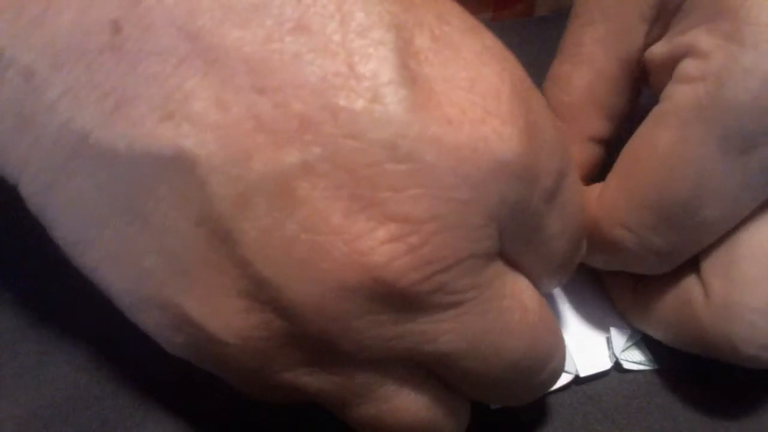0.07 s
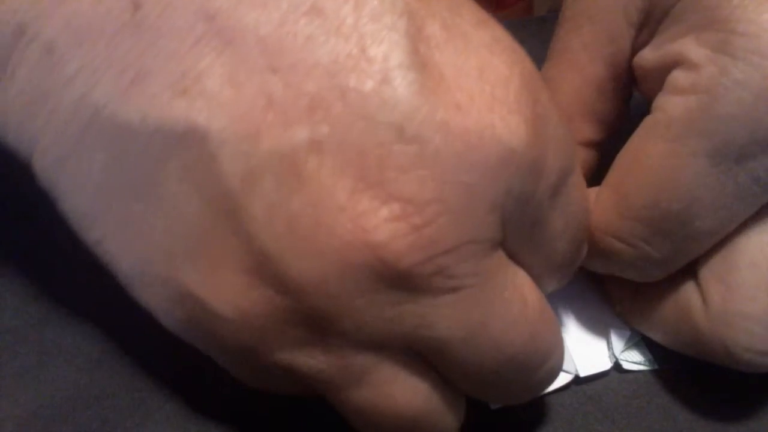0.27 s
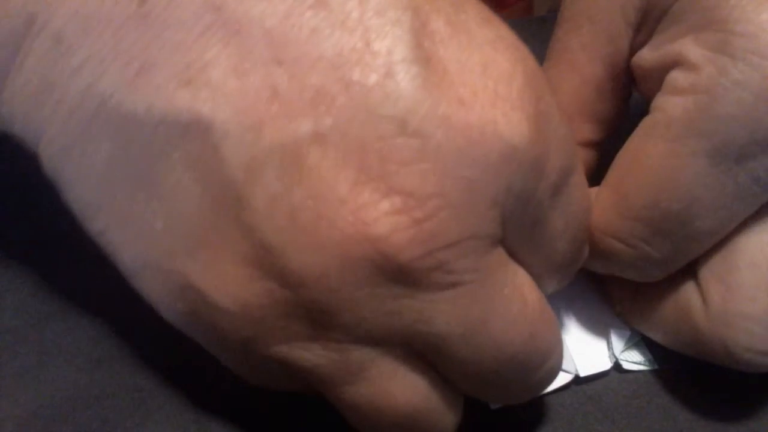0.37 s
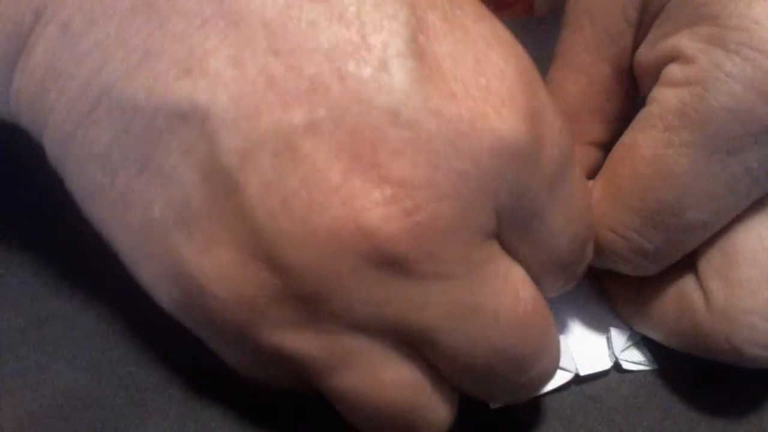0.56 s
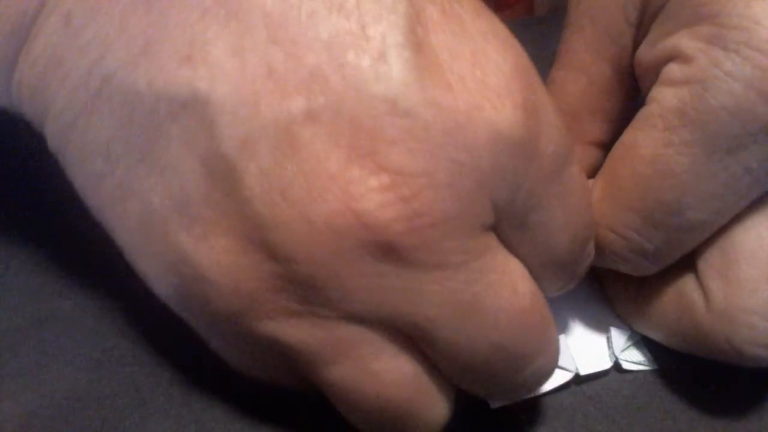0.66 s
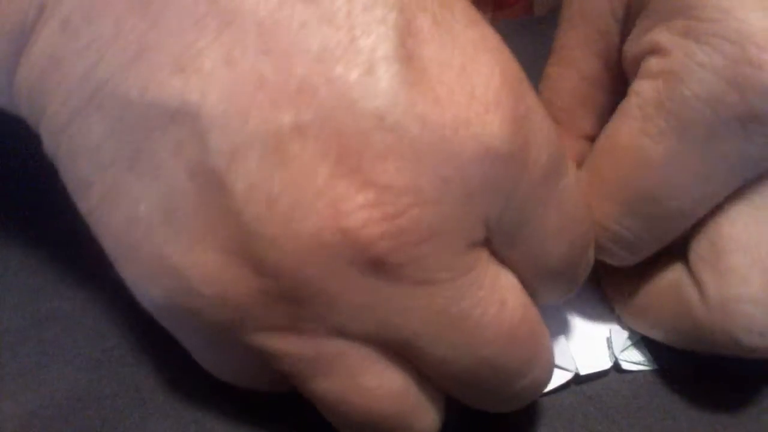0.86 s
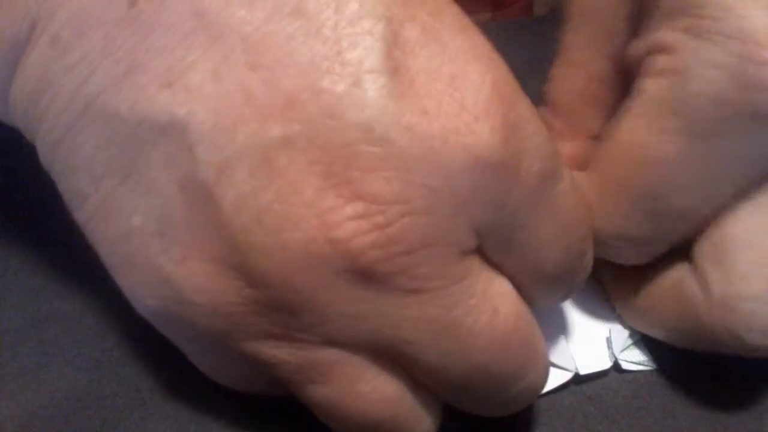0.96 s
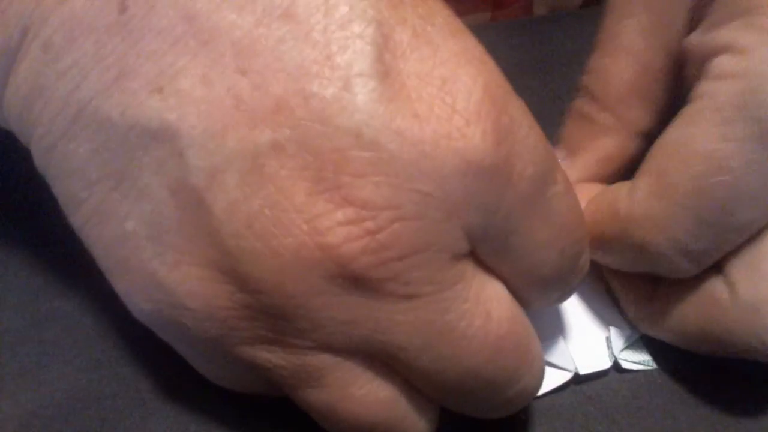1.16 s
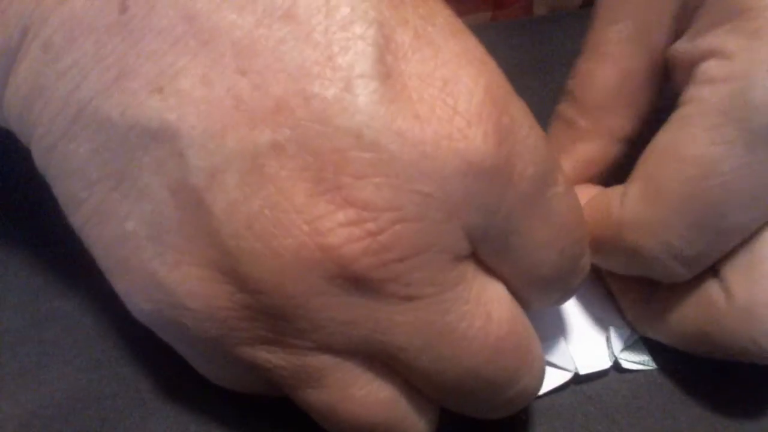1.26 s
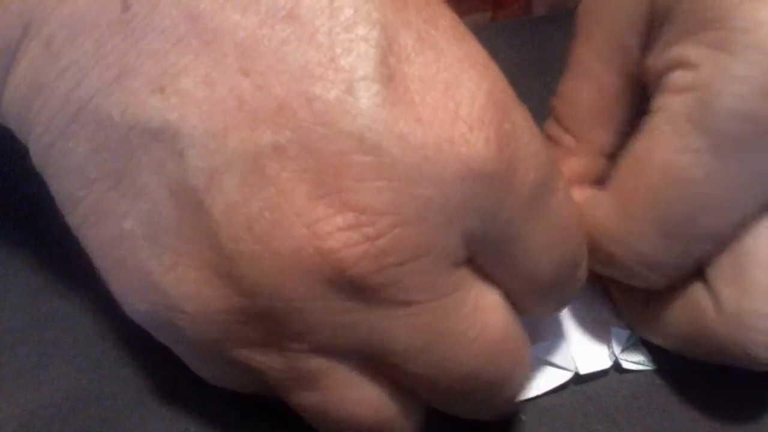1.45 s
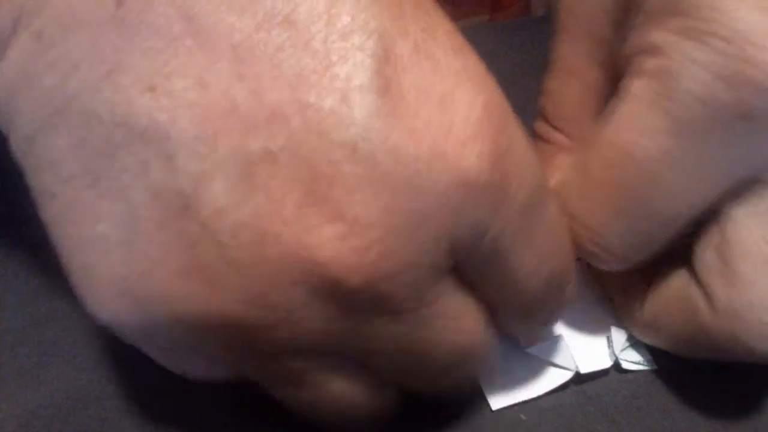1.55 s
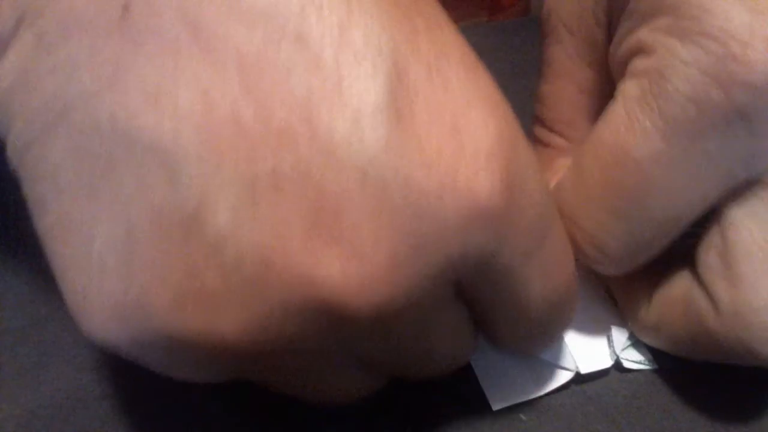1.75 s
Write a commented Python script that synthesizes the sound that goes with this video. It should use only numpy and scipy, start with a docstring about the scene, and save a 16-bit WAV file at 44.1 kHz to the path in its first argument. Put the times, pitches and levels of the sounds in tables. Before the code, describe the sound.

Stiff paper folded by hand, heard very close in a small quiet room. Faint ticks open, then one sharp, bright crack at 0.24 s. A smaller snap follows at 0.39 s, light ticks near 0.6 s, and a cluster of snaps and crisp crinkles from 0.68 to 0.83 s, with faint soft finger bumps. It nearly quiets, then a fingernail scrapes along the crease from 1.36 to 1.7 s, strongest around 1.53 s, before faint room air.

```python
"""A few faint ticks and small snaps over quiet room air lead to one sharp crack as a fold in stiff
paper gives. More snaps, ticks and crinkles follow as fingers press it flat on a cloth-covered table,
close to the microphone, and a fingernail runs along the crease. Impulses ring the sheet for snaps,
bell-shaped wave packets make ticks and bumps, and random fibre clicks make every rub. A small quiet
room answers briefly."""
import sys
import numpy as np
from scipy import signal
from scipy.fft import rfft
from scipy.io import wavfile

SR = 44100
rng = np.random.default_rng(int(sys.argv[2]) if len(sys.argv) > 2 else 0)


def digitize_waveform(pressure):
    """Quantize a signal to 16-bit integers and store it at the path in sys.argv[1].

    Rows of a 2-D input are taken as channels; values are limited to [-1, 1].
    """
    field = np.atleast_2d(pressure).T
    bounded = np.clip(field, -1, 1)
    quanta = np.round(bounded * 32767).astype(np.int16)
    wavfile.write(sys.argv[1], SR, quanta)


N = 79380
TIME = np.arange(N) / SR


def amp(db):
    """Decibels to gain."""
    return 10 ** (np.asarray(db) / 20)


def evened(x):
    """Scales to rms 1."""
    return x / np.sqrt(np.mean(x ** 2) + 1e-20)


def add(mix, start_s, sound):
    """Mixes a sound in at its start time."""
    part = mix[max(round(start_s * SR), 0):][:len(sound)]
    part += sound[:len(part)]


def through(x, response):
    """Passes x through an impulse response."""
    return signal.fftconvolve(x, response)[:len(x)]


PIVOT_HZ = 3000  # a tilt leaves this frequency unchanged


def ring(colour, tilt=0, size=2048):
    """Minimum-phase impulse response of unit energy with this colour, tilted in dB per octave."""
    hz = np.maximum(abs(np.fft.fftfreq(size, 1 / SR)), 1)
    colour_hz, colour_db = np.transpose(colour)
    db = np.interp(np.log(hz), np.log(colour_hz), colour_db)
    # the tilt levels off an octave below the pivot
    db = db + tilt * np.log2(np.maximum(hz, PIVOT_HZ / 2) / PIVOT_HZ)
    spectrum = np.exp(np.conj(signal.hilbert(np.log(amp(db)))))
    response = np.fft.ifft(spectrum).real
    return response / np.linalg.norm(response)


def tail(t60_s, delay_s):
    """Dense random echoes of unit energy that start after a delay and die away."""
    t = TIME[:SR // 3]
    echoes = rng.standard_normal(len(t)) * amp(-60 * t / t60_s) * (t > delay_s)
    return echoes / np.linalg.norm(echoes)


GRIP_DB, GRIP_S = .5, .006  # depth of the catch and let-go; half length of its smoothing window


def grains(per_s, spread_db):
    """Tiny slips of paper fibres: random clicks of uneven size, in clumps as the grip varies."""
    size = amp(spread_db * np.minimum(rng.exponential(1, N), 4))
    grip = evened(through(rng.standard_normal(N), np.hanning(int(2 * GRIP_S * SR))))
    sign = rng.choice([-1, 1], N)
    slipping = rng.random(N) < per_s / SR
    return evened(amp(GRIP_DB * grip) * size * sign * slipping)


def packets(rows):
    """Soft pushes: a few cycles under a bell-shaped envelope."""
    out = np.zeros(N)
    for centre_s, db, hz, half_s in rows:
        t = TIME - centre_s
        out += amp(db) * np.exp(-(t / half_s) ** 2) * np.sin(2 * np.pi * hz * t)
    return out


def rubs(rows, colour, release_s, per_s, spread_db):
    """Short bursts of fibre slips that ring the sheet: attack, a hold that fades or grows, release."""
    out = np.zeros(N)
    t = TIME[:SR // 6]
    for start_s, attack_s, length_s, db, change_db, tilt in rows:
        rise = np.minimum(t / attack_s, 1)
        hold = amp(db + change_db * np.minimum(t / length_s, 1))
        release = np.exp(-np.maximum(t - length_s, 0) / release_s)
        slips = grains(per_s, spread_db)[:len(t)]
        add(out, start_s, through(rise * hold * release * slips, ring(colour, tilt)))
    return out


FLUTTER_DB, FLUTTER_T60_S = -10, .022  # the sheet shivers after each snap and tick edge
FLUTTER_DELAY_S = .0009


def buckle(colour, db, tilt, flutter_db, t60_s):
    """One impulse rings the sheet, which shivers for a moment."""
    hit = ring(colour, tilt)
    hit = hit * amp(db) / abs(hit).max()
    return hit + amp(flutter_db) * through(hit, tail(t60_s, FLUTTER_DELAY_S))


AIR_DB = -71  # rms
HUM_HZ, HUM_DB = 827, -80.5  # faint whine, peak level
# Spectrum of the room air: f/Hz, relative level/dB
AIR_COLOUR = [(15, -45.5), (25, -30), (50, -17.5), (110, 0), (200, -2.5), (350, -7.5), (700, -10.5),
              (850, -11), (1000, -16.5), (2000, -20), (4200, -28), (5500, -37), (10000, -40), (15000, -41)]


def air():
    """Steady filtered noise for the room, with a faint sine whine in it."""
    noise = evened(through(rng.standard_normal(N), ring(AIR_COLOUR, size=8192)))
    return amp(AIR_DB) * noise + amp(HUM_DB) * np.sin(2 * np.pi * HUM_HZ * TIME)


ROOM_DB, CRACK_ROOM_DB = -22, -23.5  # echo sends
ROOM_T60_S, ROOM_DELAY_S = 0.12, .008
# Colour of what the room gives back: f/Hz, relative level/dB
WALL_COLOUR = [(300, 1.5), (2500, -2), (5000, -6.5), (10000, -8.5)]


def room(paper, loud):
    """The walls return dense, short, coloured echoes of the paper and of its crack."""
    walls = ring(WALL_COLOUR)
    walls = walls / abs(rfft(walls)).max()
    echoes = through(tail(ROOM_T60_S, ROOM_DELAY_S), walls)
    return through(amp(ROOM_DB) * paper + amp(CRACK_ROOM_DB) * loud, echoes)


# Fingertips bumping the table: centre t/s, peak level/dB, f/Hz, half length t/s
TABLE_BUMPS = [(.298, -57, 126.7, 0.0073), (.391, -54, 150, 0.0036), (.457, -60, 230, 0.0031),
               (.5905, -53, 165, 0.0046), (.721, -58, 160, 0.0042), (.921, -61, 187.3, 0.0052),
               (1.063, -64.5, 224, 0.0052), (1.387, -60, 255.5, 0.0056), (1.614, -62, 128, 0.0072)]


def bumps():
    """Fingertips push the table into a few soft low cycles."""
    return packets(TABLE_BUMPS)


FIBRES_PER_S, FIBRE_SPREAD_DB = 14000, 2.2  # slips under a finger or nail
# Fingers sliding on a ringing panel: start t/s, length t/s, level/dB, f/Hz, bandwidth f/Hz
PANEL_CHAFES = [(0.157, 0.012, -77, 3900, 1600), (.414, 0.04, -56, 2810, 880),
                (0.419, 0.021, -66, 4050, 694), (0.526, 0.054, -72, 3250, 1480),
                (0.658, .035, -56, 2900, 600), (0.792, 0.0083, -60.5, 1410, 500),
                (0.818, 0.013, -55.5, 1450, 395), (1.006, .012, -68.5, 1900, 903),
                (1.012, 0.042, -67.5, 3200, 698), (1.093, .028, -68.5, 680, 249.4),
                (1.231, 0.019, -70, 1640, 400), (1.383, .014, -71, 3060, 1200),
                (1.504, .06, -60, 2090, 496), (1.573, 0.059, -56, 2215, 447),
                (1.616, 0.061, -56, 2760, 604), (1.662, .032, -69.5, 400, 350),
                (1.686, 0.038, -76, 4200, 800)]


def chafes():
    """Fibre slips under a sliding finger swell and fade in one resonance of the panel."""
    out = np.zeros(N)
    t = TIME[:SR // 20]
    for start_s, length_s, db, hz, width_hz in PANEL_CHAFES:
        mode = t * np.exp(-np.pi * width_hz * t) * np.sin(2 * np.pi * hz * t)
        progress = np.clip((TIME - start_s) / length_s, 0, 1)
        swell = np.sin(np.pi * progress).clip(0) ** .5
        ringing = evened(through(grains(FIBRES_PER_S, FIBRE_SPREAD_DB), mode))
        out += amp(db) * swell * ringing
    return out


CRINKLE_RELEASE_S = .004
CRINKLES_PER_S, CRINKLE_SPREAD_DB = 8400, 2.5
# Bursts of crinkling: start t/s, attack t/s, length t/s, level/dB,
# level change over the length/dB, brightness/dB per octave
PRESSED_CRINKLES = [(.221, 0.0026, 0.017, -66.5, 3, -3.5), (.3215, .001, 0.027, -71, -5, 3.5),
                    (.382, .002, 0.015, -59.5, 6, -6), (.412, 0.0022, 0.038, -59.5, -10, -5),
                    (.703, .002, 0.031, -53.5, -6.5, -1.5), (.744, 0.0026, .03, -57.5, 4.5, -2.5),
                    (.771, 0.0054, .022, -39, -4.5, 2.5), (.793, .002, 0.011, -55, -15, -8),
                    (.810, 0.0018, 0.016, -52, 0, 1.5), (.903, .003, 0.012, -68.5, 0, -14.5),
                    (.96, 0.0097, 0.042, -81.5, 5, 5), (1.002, 0.0065, 0.019, -62.5, -4, 0.5),
                    (1.03, .005, .07, -76.5, -6, 3), (1.224, 0.01, 0.03, -54.5, -12, 0)]
# Colour of a crinkle: f/Hz, relative level/dB
CRINKLED_SHEET = [(600, -27.5), (1300, -19), (1650, -18), (2000, -4), (2700, 1.5), (4400, -9),
                  (5100, -18.5), (6500, -20), (8500, -33), (11500, -43), (15000, -65)]


def crinkles():
    """Paper under pressure gives in bursts of tiny slips that ring the sheet."""
    return rubs(PRESSED_CRINKLES, CRINKLED_SHEET, CRINKLE_RELEASE_S, CRINKLES_PER_S, CRINKLE_SPREAD_DB)


TICK_T60_S, TICK_RING_DB = .09, -15
TICK_EDGE_DB, TICK_EDGE_TILT_DB = -12, 2  # edge relative to its tick; brightness in dB per octave
# Small panels flipping over softly: centre t/s, peak level/dB, f/Hz, half length t/s
PANEL_TICKS = [(.0012, -47.5, 2850, 0.00053), (0.0485, -44, 2830, 0.00086), (0.1536, -41.5, 2606, .0011),
               (0.221, -50, 4150, 0.00077), (0.224, -49.5, 3900, 0.00061), (0.5594, -44, 3280, 0.00037),
               (0.5806, -48.5, 2870, 0.00041), (0.5845, -43, 3570, 0.00043), (.5963, -51, 3150, .0004),
               (0.6115, -56, 2880, 0.00061), (0.6178, -51, 3350, 0.00042)]


def ticks():
    """Small panels flip over with a crisp edge and leave a faint ring."""
    flips = packets(PANEL_TICKS)
    for centre_s, db, _, _ in PANEL_TICKS:
        edge = buckle(SNAPPED_SHEET, db + TICK_EDGE_DB, TICK_EDGE_TILT_DB, FLUTTER_DB, FLUTTER_T60_S)
        add(flips, centre_s, edge)
    return flips + amp(TICK_RING_DB) * through(flips, tail(TICK_T60_S, 0.00049))


SLIDE_RELEASE_S = 0.0053
# Short slides of the nail: start t/s, attack t/s, length t/s, level/dB,
# level change over the length/dB, brightness/dB per octave
NAIL_SLIDES = [(.658, 0.0042, 0.056, -54, -5, 2), (1.3575, 0.0028, 0.018, -49, -5.5, 2),
               (1.406, .005, 0.011, -52, -2.5, 1.5)]
# Colour of nail on paper, for slides and crease: f/Hz, relative level/dB
NAIL_COLOUR = [(400, -43), (1000, -30.5), (1600, -27), (2000, -8.5), (2700, 2.5), (3600, -2.5),
               (4400, -0.5), (5200, -13), (6400, -8.5), (8100, -22), (9500, -34.5), (11500, -49.5),
               (15000, -62)]


def slides():
    """The nail slips briefly over the fibres and rings the sheet."""
    return rubs(NAIL_SLIDES, NAIL_COLOUR, SLIDE_RELEASE_S, FIBRES_PER_S, FIBRE_SPREAD_DB)


# The long creasing stroke: t/s, level/dB, brightness/dB per octave
CREASE_STROKE = [(1.409, -61, -3), (1.42, -58, -2), (1.443, -58.5, 2), (1.46, -53.5, 1),
                 (1.535, -46.5, 2.5), (1.60, -52.5, 1), (1.645, -55, 2), (1.67, -61.5, -1),
                 (1.69, -71.5, -7.5), (1.74, -85, -2)]


def crease():
    """The nail drags over the fibres along the fold as level and brightness glide together."""
    point_s, db, tilt = np.transpose(CREASE_STROKE)
    stroking = (TIME > point_s[0]) * (TIME < point_s[-1])
    level = amp(np.interp(TIME, point_s, db)) * stroking
    slips = grains(FIBRES_PER_S, FIBRE_SPREAD_DB) * level
    reach = 6  # dB per octave at either end of the blend
    bright = np.clip(np.interp(TIME, point_s, tilt) / reach, -1, 1)
    dull, plain, keen = (through(slips, ring(NAIL_COLOUR, k * reach)) for k in (-1, 0, 1))
    return np.maximum(-bright, 0) * dull + (1 - abs(bright)) * plain + np.maximum(bright, 0) * keen


# Creases buckling: t/s, peak level/dB before flutter, brightness/dB per octave
CREASE_SNAPS = [(0.0186, -50, 4), (0.09, -59.5, -2), (.1262, -66, 7), (0.2107, -64, -2),
                (.3219, -55.5, 2.5), (.3836, -43, -14), (.3940, -18, 1), (0.395, -31.5, -6),
                (0.412, -33.5, -9.5), (0.4144, -37.5, -5), (.4222, -48.5, -4), (0.4275, -43.5, -3),
                (.4312, -47, 0), (0.4614, -54, -6), (.4677, -51.5, -11.5), (.5290, -43.5, -4.5),
                (0.602, -51.5, -12), (0.676, -38.5, -1), (.7024, -27, -3), (0.7053, -36.5, -4.5),
                (0.7077, -38, -1), (0.7235, -42, -3), (.7250, -49, 0), (.7439, -33, -3.5), (0.764, -46, -8),
                (0.7756, -29, -0.5), (0.7826, -33, 0.5), (0.789, -36, 4), (0.8148, -23, 0.5),
                (0.8728, -54, -12), (0.8755, -55, -5), (0.882, -58, -6), (0.905, -57, -14),
                (1.0089, -53, -1), (1.3600, -48, 8)]
# Colour of a snap, also of a tick's edge: f/Hz, relative level/dB
SNAPPED_SHEET = [(300, -32.5), (900, -30.5), (1200, -19), (1550, -29.5), (2000, -4.5), (2600, 0.5),
                 (4400, -4.5), (5000, -24.5), (7500, -27.5), (9500, -42.5), (12000, -67.5), (15000, -79.5)]


def snaps():
    """Creases buckle one by one, each an impulse that rings the sheet."""
    out = np.zeros(N)
    for start_s, db, tilt in CREASE_SNAPS:
        add(out, start_s, buckle(SNAPPED_SHEET, db, tilt, FLUTTER_DB, FLUTTER_T60_S))
    return out


CRACK_FLUTTER_DB, CRACK_FLUTTER_T60_S = -14.5, .024
# The fold giving way: t/s, peak level/dB before flutter
FOLD_CRACK = (.2432, -9)
# Colour of the crack: f/Hz, relative level/dB
CRACKED_SHEET = [(150, -43), (350, -34.5), (550, -18), (900, -8), (1100, -7), (1300, -9.5), (1650, -10.5),
                 (1950, 0), (2300, 1), (2850, -2), (3300, -18), (4400, -13), (5500, -28.5), (6300, -29.5),
                 (6900, -42.5), (8400, -41.5), (10500, -66), (15000, -91.5)]


def crack():
    """The whole fold gives way at once: one strong impulse rings the sheet."""
    out = np.zeros(N)
    start_s, db = FOLD_CRACK
    add(out, start_s, buckle(CRACKED_SHEET, db, 0, CRACK_FLUTTER_DB, CRACK_FLUTTER_T60_S))
    return out


def scene():
    """Paper, table and room in one channel."""
    paper = chafes() + crinkles() + ticks() + slides() + crease() + snaps()
    loud = crack()
    mix = air() + room(paper, loud) + bumps() + paper + loud
    return mix[None]


EDGE_HZ = 15700


def record(dry):
    """The recorder's band limit: a steep low-pass."""
    low_pass = signal.firwin(511, EDGE_HZ, window=("kaiser", 9), fs=SR)
    return signal.oaconvolve(dry, low_pass[None], "same")


dry = scene()
out = record(dry)
digitize_waveform(out)
```